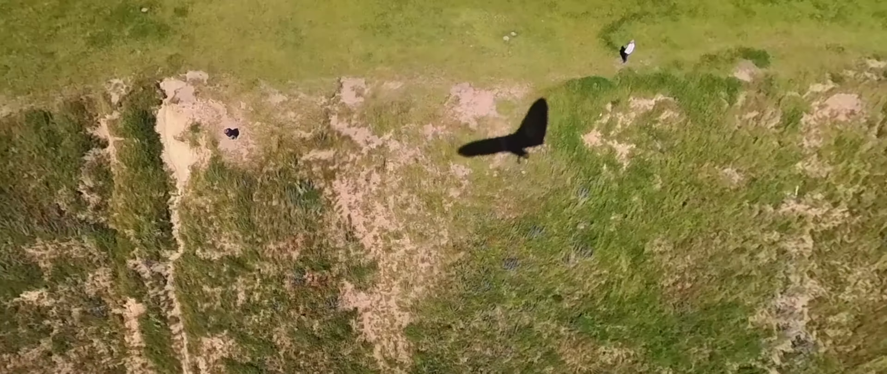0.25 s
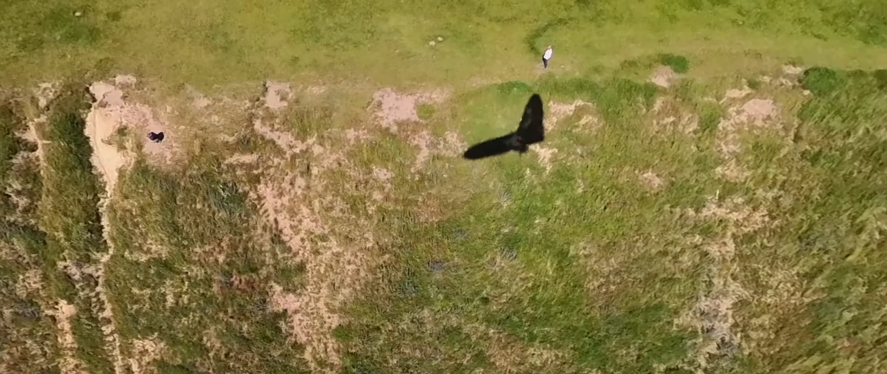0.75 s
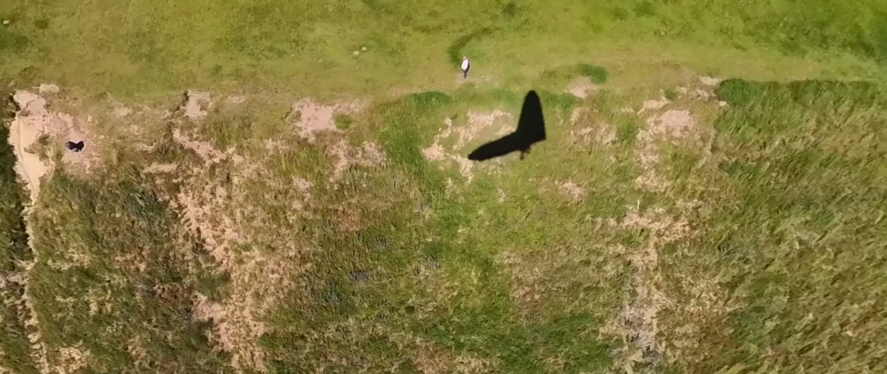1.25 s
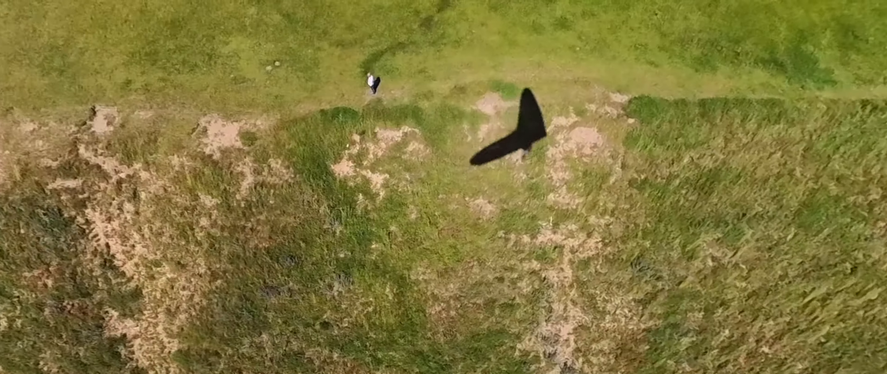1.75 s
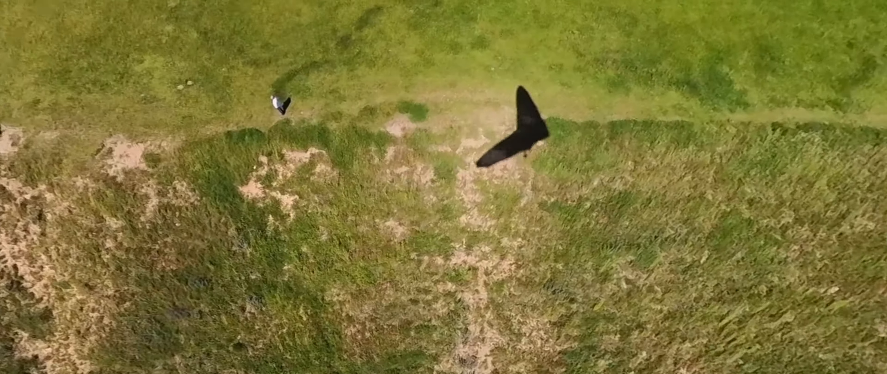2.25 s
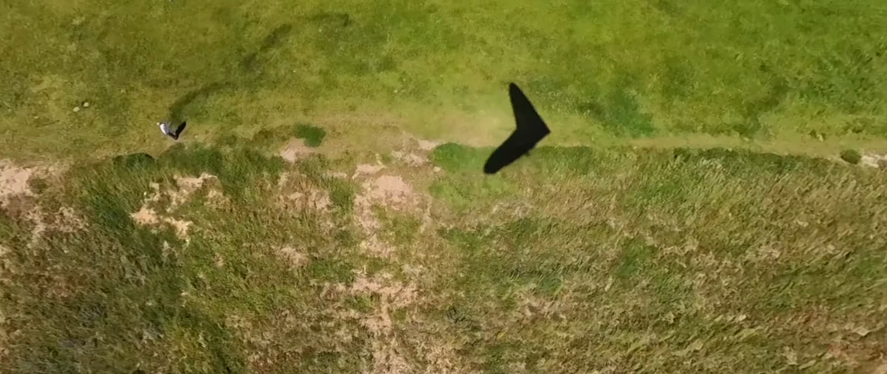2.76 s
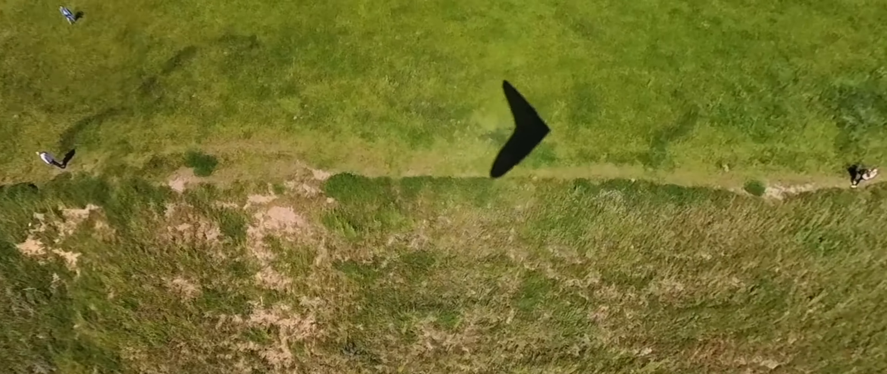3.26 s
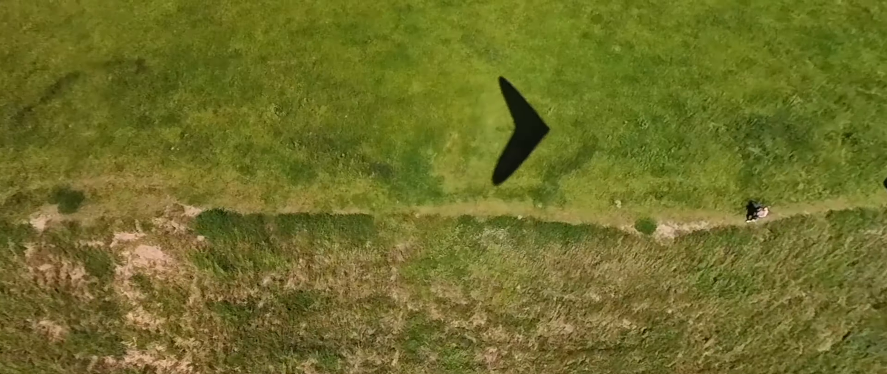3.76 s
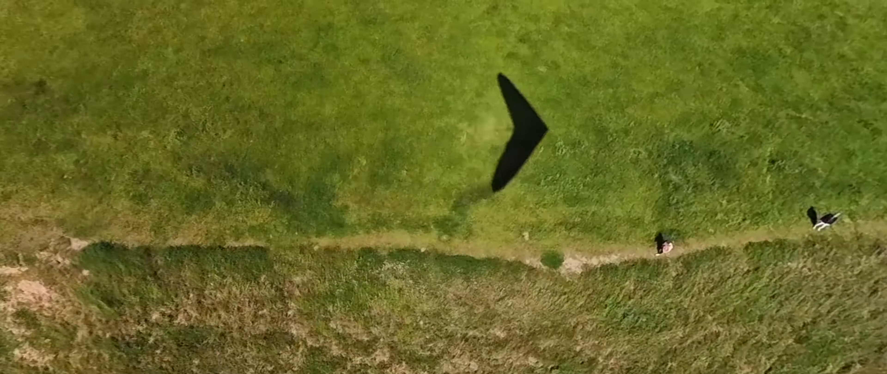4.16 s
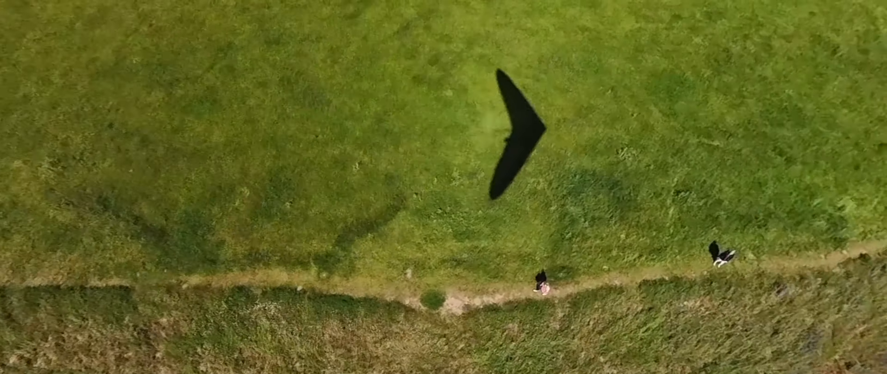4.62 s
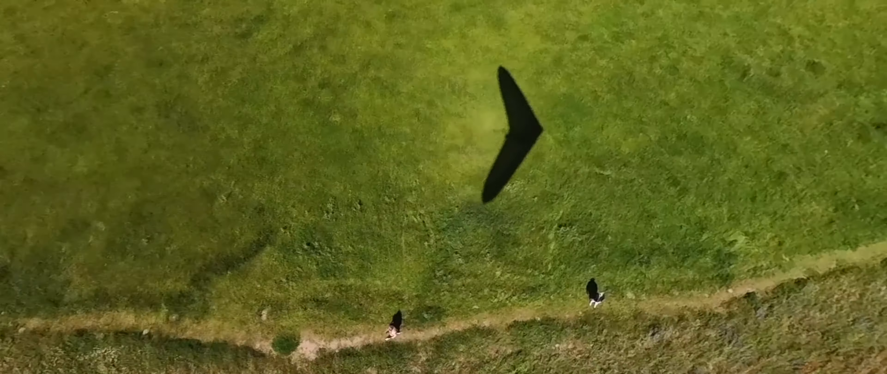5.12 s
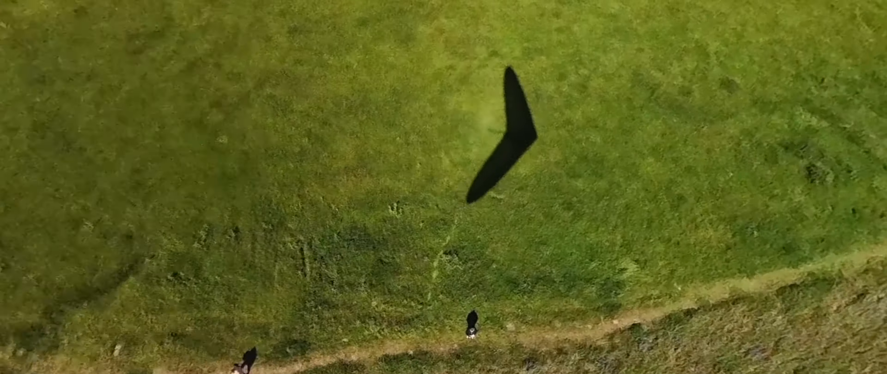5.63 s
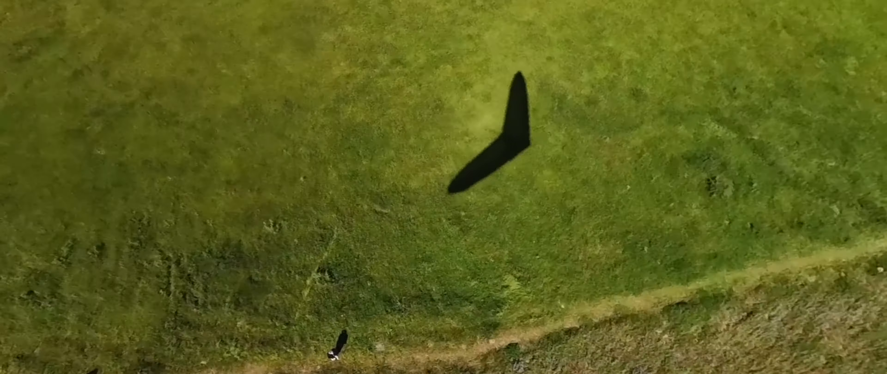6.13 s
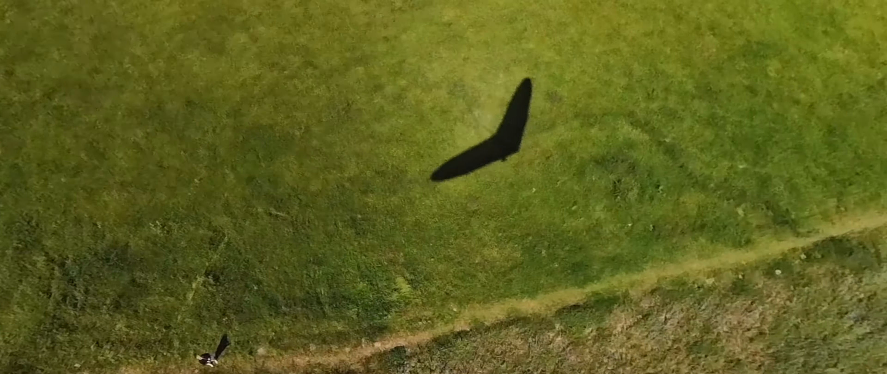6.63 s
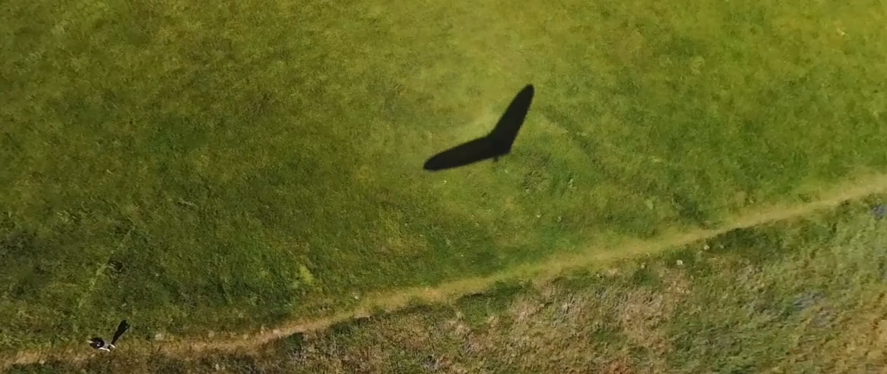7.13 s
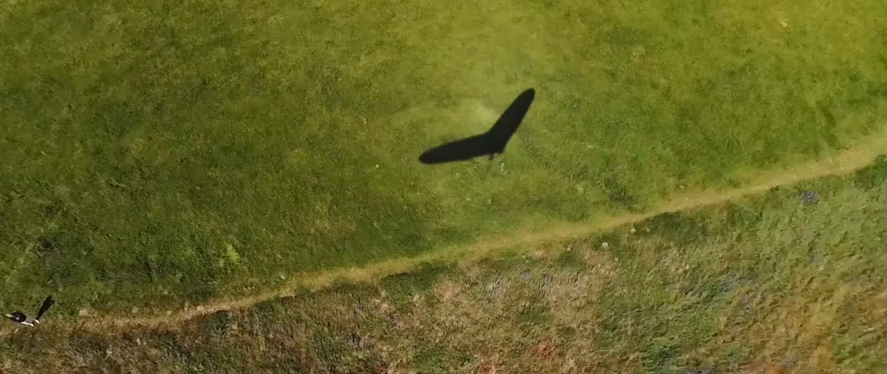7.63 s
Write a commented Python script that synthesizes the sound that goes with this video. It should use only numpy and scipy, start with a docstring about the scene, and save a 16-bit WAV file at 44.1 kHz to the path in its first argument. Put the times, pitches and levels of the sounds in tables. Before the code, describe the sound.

Close wind noise on a microphone carried through the air by a gliding wing: a continuous deep rumble with a rushing layer and light hiss. Gusts knock against it with short low thumps and small ticks, including one clear pop about halfway. As the glider turns, the hiss grows duller and the air briefly moans with a hollow, wavering tone. The buffeting gets busier at the end.

```python
"""Wind on a gliding microphone

Air streams past a small microphone on a glider. Big swirls of air make a lumpy rumble, tiny ones
a rush and a thin hiss. Swirls peeling off the housing roar at a pitch that follows the airspeed,
and moan in the turn. Single gusts thump the microphone, and the hiss often dips after them."""
import sys
import numpy as np
from scipy import signal
from scipy.io import wavfile
from scipy.ndimage import uniform_filter1d

SR = 44100
rng = np.random.default_rng(int(sys.argv[2]) if len(sys.argv) > 2 else 0)


def log_audio(samples):
    """Write samples as a 16-bit WAV file to the path given in sys.argv[1]."""
    # one column per channel
    frames = np.atleast_2d(samples).T
    # limit to full scale, then quantise
    limited = np.clip(frames, -1, 1)
    pcm = np.round(limited * 32767).astype(np.int16)
    wavfile.write(sys.argv[1], SR, pcm)


N = 347586


def gain_of(db):
    """Turns decibels into a volume multiplier."""
    return 10 ** (np.asarray(db) / 20)


def evened(x):
    """Scales a signal to an average strength (rms) of 1."""
    return x / np.sqrt(np.mean(x ** 2) + 1e-20)


def tone_at(points, hz):
    """Looks up how strong a tone table is at frequency hz."""
    f, db = np.transpose(points)
    return np.interp(np.log(hz + 0.0012), np.log(f), db)


def curve(rows, t, column):
    """Follows one column of a table through time."""
    table = np.array(rows)
    return np.interp(t, table[:, 0], table[:, column])


def bumps(rows, t, width_s, column):
    """A smooth rise or fall in dB around each row's time."""
    return sum(row[column] * np.exp(-((t - row[0]) / width_s) ** 2) for row in rows)


def lumps(span_s):
    """A random wobble of strength 1 that changes within span_s."""
    span = round(span_s * SR)
    return evened(uniform_filter1d(uniform_filter1d(rng.standard_normal(N), span), span))


def blur(grid, bands, frames):
    """Smooths a grid across pitch, then across time."""
    return uniform_filter1d(uniform_filter1d(grid, bands, axis=0), frames, axis=1)


def air_noise(tone_db, level_db, patchy_db, flicker_db, size, broad_db=0):
    """Noise shaped by tone_db(hz, s), with random louder patches and an overall flicker."""
    frames = 4 * N // size + 5
    hz = np.fft.rfftfreq(size, 1 / SR)[:, None]
    s = np.arange(frames) * size / 4 / SR
    real, imag, chance = rng.standard_normal((frames, len(hz), 3)).T
    broad = evened(uniform_filter1d(blur(chance, 9, 24), 16, axis=1))
    patches = evened(blur(chance, 3, 10))
    flicker = evened(uniform_filter1d(rng.standard_normal(frames), 3))
    shape = gain_of(tone_db(hz, s)) * np.ones(frames)
    shape /= np.sqrt((shape ** 2).sum(0))  # the tone moves, the power stays
    wobble = gain_of(patchy_db * patches + broad_db * broad + flicker_db * flicker)
    spectra = (real + 1j * imag) * shape * wobble
    noise = signal.istft(spectra, nperseg=size, noverlap=3 * size // 4)[1][:N]
    return gain_of(level_db) * evened(noise)


# The level ducks, mostly after a loud thump, then creeps back: t/s, rough depth/dB
LEVEL_DIPS = [(.352, 4.5), (.87, 3), (1.49, 3.5), (1.56, 1.5), (1.645, -0.5), (2.27, 1), (2.64, 2.5),
              (3.33, 1.5), (4.52, 1), (4.76, 3.5), (4.93, 1), (5.9, 2), (6.94, 1.5), (7.195, 4), (7.62, 5)]
def dips_db(t):
    """Each listed dip falls fast and creeps back, like a recorder turning itself down."""
    drop_s, recover_s = 0.013, 0.12
    return -sum(db * np.clip((t - s) / drop_s, 0, 1) * np.exp(-np.maximum(t - s, 0) / recover_s)
                for s, db in LEVEL_DIPS)


# Air passing the housing: t/s, roar level/dB, roar f/Hz, rush level/dB, hiss level/dB
AIRFLOW = [(0, -29.5, 286, -41, -54.5), (.25, -22, 266, -36, -51), (.55, -26, 276, -38, -52),
           (.8, -21.5, 267, -36.5, -51.5), (1.3, -25, 273, -37, -53), (1.65, -28.5, 306, -41, -57.5),
           (1.95, -22, 273, -36.5, -52.5), (2.5, -22.5, 276.5, -37.5, -52.5), (3.0, -25, 288, -40, -55.5),
           (3.6, -23.5, 263.5, -40, -55), (4.0, -21, 273, -39, -54), (4.7, -24.5, 290.5, -39.5, -55.5),
           (5.3, -24.5, 305, -38, -55.5), (5.9, -24, 315, -36.5, -55.5), (6.4, -24, 318, -38.5, -57.5),
           (6.85, -25, 306, -35, -55.5), (7.05, -26, 299, -38.5, -59), (7.25, -25.5, 293, -41, -60.5),
           (7.4, -28, 292, -38, -58), (7.58, -24.5, 305, -36.5, -57), (7.88, -26, 314, -37.5, -58.5)]
def airflow(t, name):
    """The changing airflow sets the roar's pitch and three layers' levels."""
    return curve(AIRFLOW, t, {"roar_db": 1, "roar_hz": 2, "rush_db": 3, "hiss_db": 4}[name])


# Moments when the rush grows louder: t/s, rise/dB
RUSH_SWELLS = [(.29, 0.5), (.76, 1.5), (.99, 2.5), (1.9, 1.5), (3.27, 1), (3.87, 3.5), (4.24, 4),
               (4.86, 3.5), (5.33, 4), (5.62, 1.5), (6.26, 3.5), (6.41, 4), (6.63, 1), (7.15, 1.5),
               (7.52, 2.5)]
def swells_db(t):
    """Brief swells of the rush, which the hiss partly follows."""
    return bumps(RUSH_SWELLS, t, width_s=0.068, column=1)


# The hiss's tone in level flight and with the wings tilted: f/Hz, relative level/dB
LEVEL_TONE = [(600, -62), (1400, 4.5), (1520, -1), (2050, 0.5), (2400, -2.5), (3050, -4.5), (3300, -6.5),
              (3750, -3), (4100, -5), (4450, -4), (4700, -7.5), (6000, -10), (7000, -11.5), (8600, -16.5),
              (9600, -20.5), (11700, -38), (13000, -66)]
TILTED_TONE = [(600, -60), (1400, -9), (1520, -3.5), (2050, -1), (2500, -7), (3400, -10), (3800, -11.5),
               (4150, -11), (4450, -13.5), (4750, -12.5), (6000, -18), (8200, -20), (10000, -24),
               (11700, -29.5), (13000, -38)]
# Leaning into the turn: t/s, share of the tilted tone/0-1
TILT = [(0, 0.2), (1, 0.1), (2.5, 0.2), (3.5, .2), (4.5, 0.3), (5.3, 0.6), (6, 0.8), (7, 0.9), (7.88, 0.8)]
# Two broad ringing bands in the hiss: t/s, lower f/Hz, its rise/dB, upper f/Hz, its rise/dB
HISS_BANDS = [(0, 4230, 0, 6500, 1), (.4, 4210, 1, 6600, 1.5), (1, 4120, -1, 7200, 1.5),
              (2, 4070, -0.5, 7360, 3), (2.9, 4240, 2.5, 7400, 2), (3.6, 4090, 1, 7330, 2.5),
              (4.4, 4100, 1, 7300, 3), (5.3, 4100, -0.5, 7260, 0), (5.9, 4310, 1, 5660, 0),
              (6.4, 4200, 1.5, 5700, 2.5), (6.95, 3990, 2, 6460, 0.5), (7.3, 3910, 1.5, 6460, -1),
              (7.55, 3990, 5.5, 6500, 0.5), (7.88, 3900, 2, 6500, -1.5)]
def hiss(t, dip_db):
    """Tiny swirls make a thin, fluttering hiss whose tone changes as the wings tilt."""
    def tone_db(hz, s):
        tilt = curve(TILT, s, 1)
        db = (1 - tilt) * tone_at(LEVEL_TONE, hz) + tilt * tone_at(TILTED_TONE, hz)
        for column, width_hz in ((1, 270), (3, 600)):
            offset_hz = hz - curve(HISS_BANDS, s, column)
            db += curve(HISS_BANDS, s, column + 1) * np.exp(-(offset_hz / width_hz) ** 2)
        return db
    level_db = airflow(t, "hiss_db") + dip_db + 0.67 * swells_db(t) + 0.5 * lumps(0.013)
    return air_noise(tone_db, level_db, patchy_db=1.4, flicker_db=0.22, size=512, broad_db=0.75)


# The rush's tone: f/Hz, relative level/dB
RUSH_TONE = [(100, -68), (400, -5), (520, -4), (630, -7.5), (750, -10.5), (1000, -14.5), (1200, -18.5),
             (1300, -22.5), (1460, -24.5), (1520, -33), (2500, -54.5), (8000, -120)]
def rush(t, dip_db):
    """Small swirls make a mid-pitched rush."""
    level_db = airflow(t, "rush_db") + 0.98 * dip_db + swells_db(t)
    return air_noise(lambda hz, s: tone_at(RUSH_TONE, hz), level_db,
                     patchy_db=0.92, flicker_db=0.13, size=1024)


# A hollow moan as the turn tightens: t/s, level/dB, f/Hz
TURN_MOAN = [(5.1, -60, 317), (5.35, -35, 322), (5.55, -20, 347), (5.75, -36, 401), (5.9, -34.5, 417),
             (6.05, -29, 351), (6.25, -31, 387), (6.5, -38, 428), (6.8, -30, 413), (7.05, -52, 380)]
def moan(t):
    """For a while the swirls peel off so regularly that they almost sing a note."""
    def tone_db(hz, s):
        offset_hz = hz - curve(TURN_MOAN, s, 2)
        return np.maximum(-6.1 * (offset_hz / 16) ** 2, -150)
    return air_noise(tone_db, curve(TURN_MOAN, t, 1), patchy_db=1.0, flicker_db=0.3, size=4096)


# The deepest layer's tone: f/Hz, relative level/dB
HEAVE_TONE = [(12, -74), (25, -31), (33, -20.5), (40, -8), (49, 4.5), (60, -5.5), (76, -6), (120, -32.5),
              (600, -120)]
# Its surges: t/s, rise/dB
SURGES = [(.68, 7), (1.1, 8.5), (1.6, 11), (2.48, 2.5), (2.86, 4.5), (4.02, 6), (5.77, 3), (5.88, 3),
          (6.12, 2), (6.47, 8), (6.68, 3), (7.53, 4)]
def heave(t, dip_db):
    """The slowest air movements make a very deep, surging sound."""
    level_db = -32 + bumps(SURGES, t, width_s=0.041, column=1) + 0.25 * dip_db + 1.2 * lumps(0.11)
    return air_noise(lambda hz, s: tone_at(HEAVE_TONE, hz), level_db,
                     patchy_db=0.41, flicker_db=0.1, size=4096)


# The rumble's tone: f/Hz, relative level/dB
RUMBLE_TONE = [(20, -70), (60, -16.5), (80, -6.5), (97, -1), (140, 2.5), (185, -0.5), (250, -6.5),
               (450, -42.5), (2000, -120)]
# Big swirls arriving (+) or gaps between them (-): t/s, rumble change/dB, roar change/dB
BIG_SWIRLS = [(.09, 4, 3), (.37, 9, 0.5), (.42, -7, 4.5), (.66, -1, -6), (.85, 5.5, 1.5), (1.05, -4, -2),
              (1.33, 3, 3), (1.41, 4, -4), (1.489, 7, 2), (1.54, 3.5, 3), (1.62, 3, 3), (1.66, -4, -5.5),
              (1.7, -3, -2), (1.81, -6, -2), (1.91, -12, 1), (2.61, 6, -0.5), (3.06, -20, 5.5),
              (3.11, 4.5, -4), (3.31, 2, 2), (3.4, -1, -1.5), (3.715, -11, -5), (4.73, 1.5, 1),
              (4.91, 1.5, 2.5), (5.0, -5, 0), (5.18, 3.5, -5), (5.36, 7.5, 6.5), (5.48, -9, 1.5),
              (5.71, 4, -8), (6.17, 4.5, -1), (6.54, -2, -4.5), (6.65, 6, -2), (6.89, -1, 3.5),
              (7.2, 6, 2.5), (7.62, 2.5, -1.5), (7.75, -7, -5.5)]
SWIRL_S = 0.024
def rumble(t, dip_db):
    """Big swirls of air hit the microphone as a lumpy rumble."""
    level_db = -24.5 + bumps(BIG_SWIRLS, t, SWIRL_S, column=1) + 0.19 * dip_db - 0.5 * lumps(0.13)
    return air_noise(lambda hz, s: tone_at(RUMBLE_TONE, hz), level_db,
                     patchy_db=0.8, flicker_db=0.13, size=4096)


# The roar's tone: multiple of its pitch, relative level/dB
ROAR_TONE = [(.1, -70), (.4, -19), (.62, -10), (.8, -5), (1.05, -3), (1.25, -5.5), (1.5, -11.5),
             (1.9, -23.5), (4.5, -69), (15, -120)]
def roar(t, dip_db):
    """Swirls peel off the housing; faster air gives a higher roar."""
    swirl_db = bumps(BIG_SWIRLS, t, SWIRL_S, column=2)
    level_db = airflow(t, "roar_db") + swirl_db + 0.64 * dip_db + 0.5 * lumps(0.092)
    return air_noise(lambda hz, s: tone_at(ROAR_TONE, hz / airflow(s, "roar_hz")), level_db,
                     patchy_db=0.92, flicker_db=0.11, size=2048)


# Low thumps of single gusts: t/s, peak level/dB, f/Hz, length/cycles
GUST_THUMPS = [(0.341, -9, 114, 1.4), (0.751, -17, 235, 1.1), (1.341, -8.5, 128, 0.78),
               (1.586, -14, 99, 1.7), (1.618, -17, 51, 0.98), (1.766, -15, 170, 1.2),
               (1.862, -14.5, 229, 2.1), (3.272, -12, 130, 1.3), (3.304, -9.5, 160, 3.1),
               (3.327, -20, 165, 1.1), (3.41, -9.5, 140, 1.4), (3.6745, -6, 165, 0.69),
               (4.761, -12.5, 171, 2.5), (5.124, -23, 140, 1.5), (5.339, -13.5, 142, 1.4),
               (5.983, -14.5, 218, 2), (7.049, -10.5, 163, 1.6), (7.187, -18, 160, 1.5),
               (7.2, -6, 192, 1.1), (7.264, -10, 133, 0.81), (7.421, -12.5, 265, 0.85),
               (7.583, -9.5, 150, 1.3), (7.626, -9, 215, 1.3), (7.666, -11, 148, 1.1),
               (7.713, -10, 146, 1.3), (7.764, -18, 169, 1.4)]
# Short mid-pitched ticks in the wind noise, with one clear pop at 3.68 s: same columns
NOISE_TICKS = [(.264, -33, 650, 1.5), (1.484, -21, 604, 1.8), (1.585, -25, 545, 1.6),
               (1.825, -27, 550, 1.7), (2.033, -22, 620, 1.3), (3.178, -28, 560, 1.4),
               (3.6794, -18, 795, 1.55), (3.976, -33, 620, 1.5), (5.011, -30, 580, 1.9),
               (5.605, -27, 615, 1.6), (6.197, -26, 620, 1.5), (7.126, -30, 650, 1.8), (7.243, -28, 600, 2),
               (7.267, -33, 600, 1.5), (7.304, -29, 610, 2), (7.503, -26, 550, 1.6), (7.546, -27, 560, 1.5),
               (7.67, -24, 600, 2.4), (7.718, -25, 760, 0.75)]
def pulses(t, rows, lag_cycles, shift_cycles):
    """Each thump or tick is a very short wave, strongest lag_cycles after its time."""
    out = np.zeros(N)
    for s, db, hz, length in rows:
        cycles = (t - s) * hz - lag_cycles
        envelope = np.exp(-(2 * cycles / length) ** 2)
        out += gain_of(db) * envelope * np.cos(2 * np.pi * (cycles - shift_cycles))
    return out


def scene():
    """Adds up all the air sounds at one microphone."""
    t = np.arange(N) / SR
    dip_db = dips_db(t)
    low_wind = heave(t, dip_db) + rumble(t, dip_db) + roar(t, dip_db) + moan(t)
    high_wind = rush(t, dip_db) + hiss(t, dip_db)
    thumps = pulses(t, GUST_THUMPS, lag_cycles=0.91, shift_cycles=0.094)
    ticks = pulses(t, NOISE_TICKS, lag_cycles=1.03, shift_cycles=0.092)
    return (low_wind + high_wind + thumps + ticks)[None]


def record(dry):
    """Trims the deepest bass, turns down and rounds off loud peaks, then trims the top treble."""
    low_cut_hz, high_cut_hz = 27, 12760
    limit_db, release_db_per_s, squeeze = -14, 45, 0.3
    cut = signal.sosfilt(signal.butter(3, low_cut_hz, "high", fs=SR, output="sos"), dry)
    level_db = 20 * np.log10(abs(cut[0]) + 1e-9)
    fall_db = np.arange(N) * release_db_per_s / SR
    held_db = np.maximum.accumulate(level_db + fall_db) - fall_db  # catch each peak, let go slowly
    over_db = np.maximum(held_db - limit_db, 0)
    turned_down = cut / gain_of(squeeze * uniform_filter1d(over_db, size=400))
    treble_cut = signal.firwin(511, high_cut_hz, window=("kaiser", 9), fs=SR)
    return signal.oaconvolve(np.tanh(turned_down), treble_cut[None], "same")


dry = scene()
out = record(dry)
log_audio(out)
```